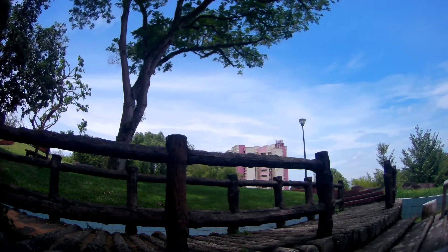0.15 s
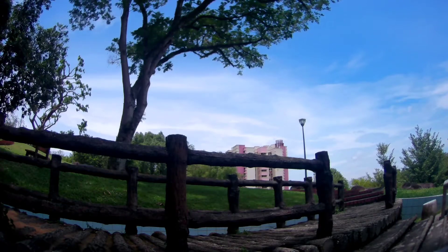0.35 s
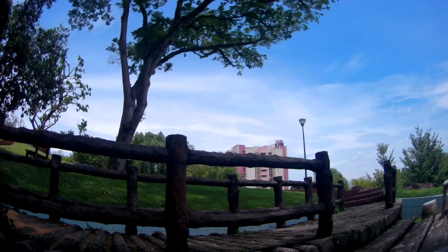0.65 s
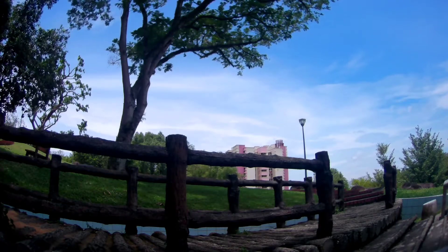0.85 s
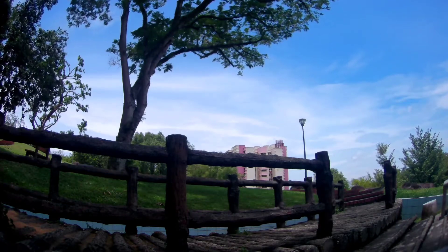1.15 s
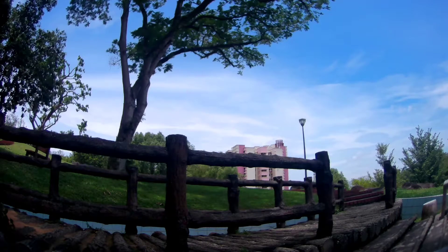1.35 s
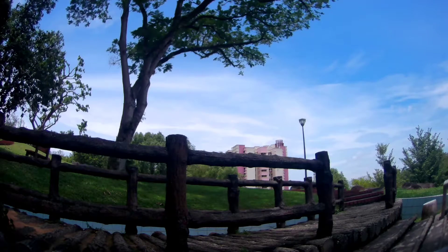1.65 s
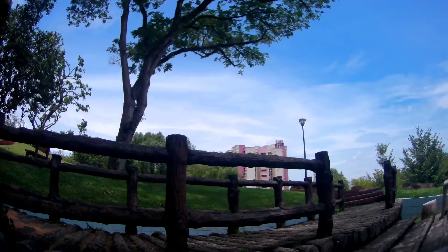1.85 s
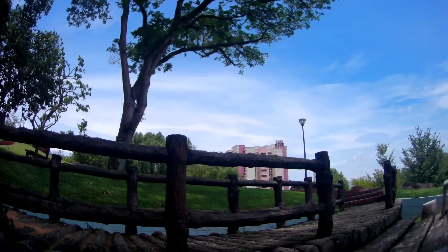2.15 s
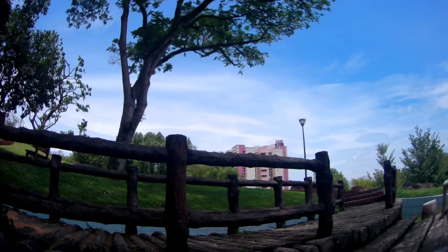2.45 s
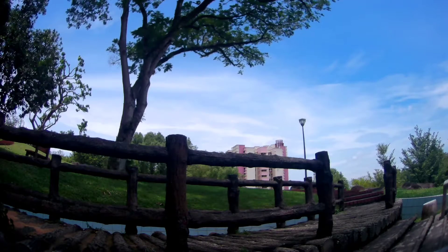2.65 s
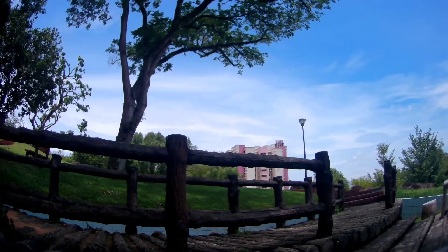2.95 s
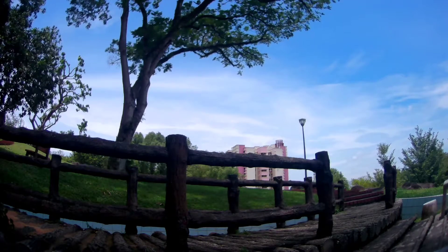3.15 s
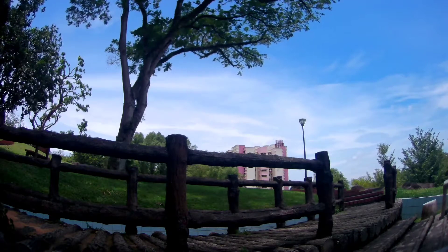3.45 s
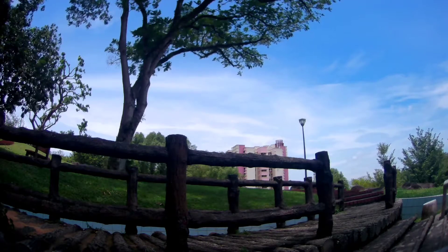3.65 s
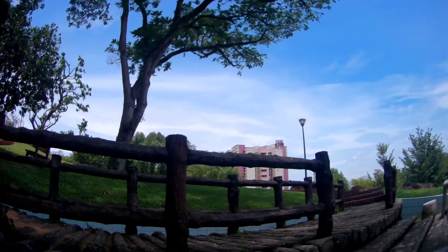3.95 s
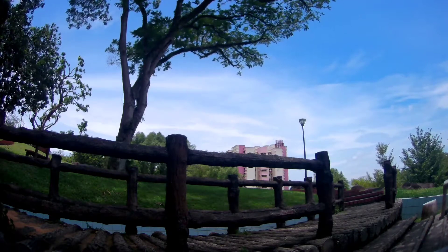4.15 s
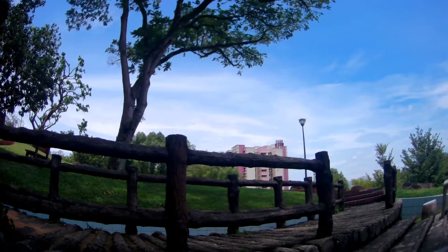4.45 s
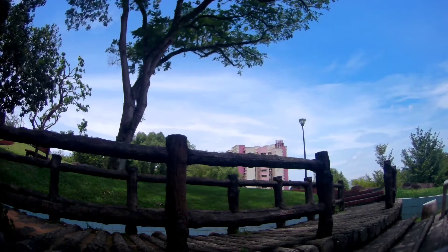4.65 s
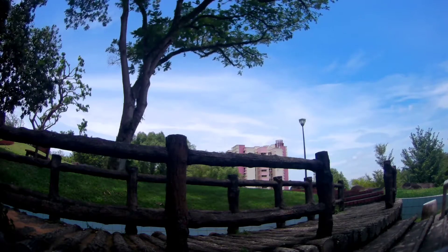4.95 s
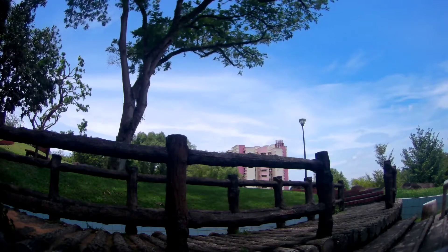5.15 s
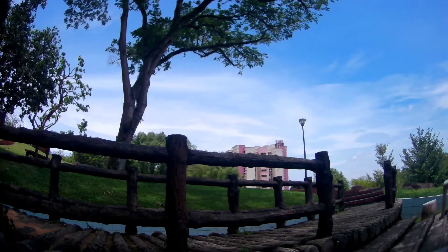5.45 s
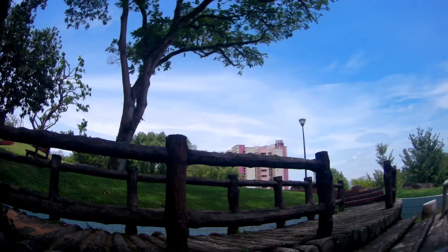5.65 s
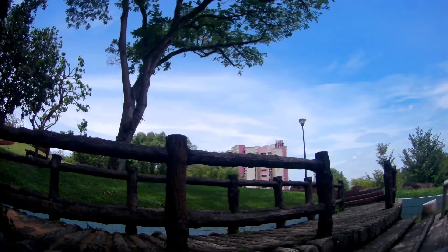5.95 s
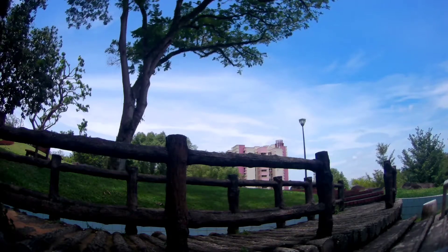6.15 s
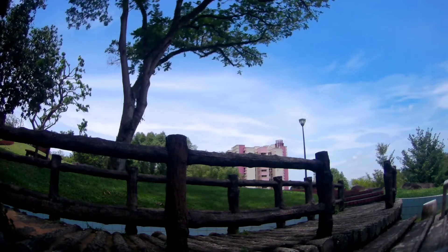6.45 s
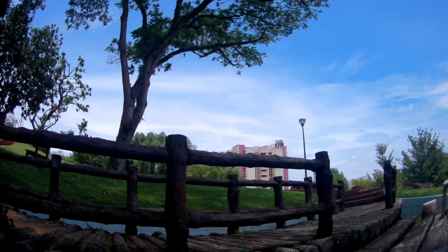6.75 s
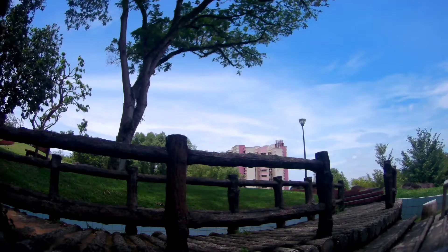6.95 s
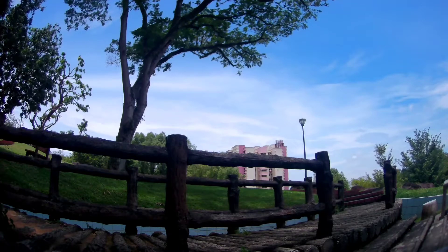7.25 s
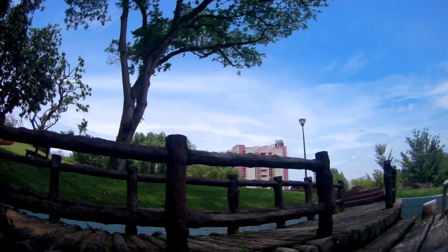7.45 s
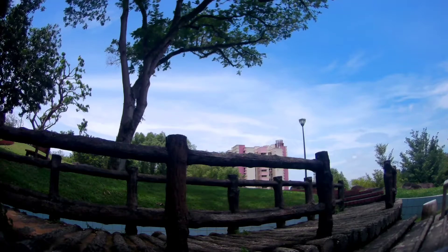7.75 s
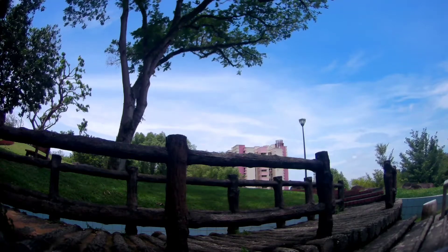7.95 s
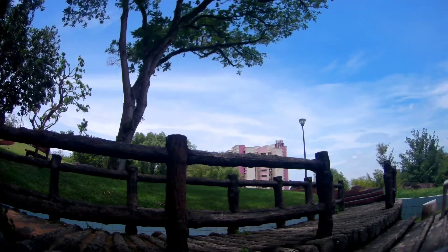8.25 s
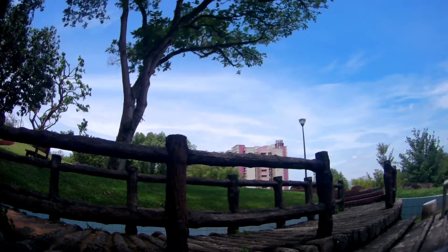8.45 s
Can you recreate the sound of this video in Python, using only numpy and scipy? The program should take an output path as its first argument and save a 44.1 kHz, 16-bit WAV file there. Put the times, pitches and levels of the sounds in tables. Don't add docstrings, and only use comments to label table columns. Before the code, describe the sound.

Light wind hisses through leaves in an open park while small birds whistle and chip, and low gusts rumble and thump the microphone.

```python
import sys
import numpy as np
from scipy import signal
from scipy.fft import rfft, irfft
from scipy.io import wavfile
from scipy.ndimage import uniform_filter1d

SR = 44100
rng = np.random.default_rng(int(sys.argv[2]) if len(sys.argv) > 2 else 0)


def attenuation_scalar(level_db):
    decades = np.asarray(level_db, float) / 20
    return 10 ** decades


def persist_wave(psi):
    counts = np.round(np.clip(psi, -1, 1) * 32767).astype(np.int16)
    wavfile.write(sys.argv[1], SR, np.atleast_2d(counts).T)


N = 379260


def unit(x):
    return x / np.sqrt(np.mean(x ** 2))


def curve(table):
    s, db = np.transpose(table)
    return np.interp(np.arange(N) / SR, s, db)


def add(track, s, sound):
    i = int(s * SR)
    track[i:i + len(sound)] += sound[:max(N - i, 0)]


def walk(rate_hz, size=N):
    hold = max(int(SR / rate_hz), 1)
    held = np.repeat(rng.standard_normal(size)[:size // hold + 1], hold)[:size]
    return 1.62 * uniform_filter1d(uniform_filter1d(held, hold), hold)


def band(x, table, lo_hz, hi_hz):
    hz = np.maximum(np.arange(len(x) // 2 + 1) * SR / len(x), 1)
    table_hz, table_db = np.transpose(table)
    colour = attenuation_scalar(np.interp(np.log(hz), np.log(table_hz), table_db))
    edges = np.sqrt(1 / (1 + (lo_hz / hz) ** 8) - 1 / (1 + (hi_hz / hz) ** 8))
    return irfft(rfft(x) * colour * edges, len(x))


def grains(per_s, spread_db):
    struck = rng.random(N) < per_s / SR
    sign = np.sign(rng.standard_normal(N))
    size = np.minimum(rng.exponential(size=N), 6)
    return unit(struck * sign * attenuation_scalar(spread_db * size))


# pitch_hz [Hz], level_db [dB per Hz]
AIR_COLOUR = [(12, -31), (20, 4.5), (59, -7.5), (126, -5), (266, -10.5), (452, -9.5), (597, -13),
              (1040, -11.5), (1870, -16), (2210, -17.5), (6540, -21.5), (8640, -16.5), (12100, -28),
              (14300, -31.5), (15500, -37.5)]
# start_s [s], level_db [dB]
CROWN_WIND = [(0.0, -46), (0.36, -46.5), (1.08, -45), (1.65, -43.5), (2.11, -44.5), (2.42, -46),
              (3.5, -46.5), (4.07, -45.5), (5.01, -46.5), (6.15, -45.5), (8.6, -45)]


def crowns():
    hiss_db = curve(CROWN_WIND)
    t = np.arange(N) / SR
    high_db = 0.98 * hiss_db + 0.37 * t
    rush_db = 0.31 * hiss_db - 0.25 * t
    stir = rng.standard_normal(N) + attenuation_scalar(-18) * grains(per_s=1500, spread_db=2.5)
    layers = [(1200, 3000, rush_db), (3000, 5500, (rush_db + hiss_db) / 2),
              (5500, 12000, hiss_db), (12000, 20000, high_db)]
    out = np.zeros(N)
    for lo_hz, hi_hz, db in layers:
        breath_db = 0.72 * walk(9)
        out += band(stir, AIR_COLOUR, lo_hz, hi_hz) * attenuation_scalar(db - db.mean() + breath_db)
    return unit(out) * attenuation_scalar(-43.0)


def town():
    wash = unit(band(rng.standard_normal(N), AIR_COLOUR, 14, 1134))
    return wash * attenuation_scalar(-44.5 + 0.63 * walk(3.19))


# pitch_hz [Hz], level_db [dB per Hz]
PORT_COLOUR = [(8.8, -31), (15, -2.5), (37, -1), (58, -4), (182, -13), (258, -22), (438, -29), (500, -22),
               (650, -70), (1100, -120)]
# start_s [s], level_db [dB]
PORT_WIND = [(0.0, -51.5), (2.27, -41), (2.51, -48.5), (3.26, -41), (3.33, -41), (4.07, -44), (4.09, -38),
             (4.48, -49), (4.93, -46.5), (5.25, -44), (6.35, -47.5), (6.44, -44.5), (6.82, -40.5),
             (7.45, -36), (7.47, -30.5), (7.88, -33.5), (8.26, -29.5), (8.6, -38)]


def port():
    roll_db = curve(PORT_WIND)
    quick_db = -0.5 * (roll_db + 49.5)
    eddies = 0.5 * grains(per_s=200, spread_db=2.5) + rng.standard_normal(N)
    rolls = unit(band(eddies, PORT_COLOUR, 25, 89)) * attenuation_scalar(0.32 * walk(8.7))
    flaps = unit(band(eddies, PORT_COLOUR, 108, 440)) * attenuation_scalar(quick_db - 3.5 + walk(10))
    return attenuation_scalar(roll_db - 3.5) * (rolls + flaps)


def note(s, length_s, bend_hz, db, edge, flutter_hz, steady):
    count = int(length_s * SR)
    hz = np.polyval(np.polyfit([0, .5, 1], bend_hz, deg=2), np.linspace(0, 1, count))
    flutter = steady + walk(flutter_hz, size=16000)[:count] + 1j * walk(flutter_hz, size=16000)[:count]
    flutter = flutter / np.sqrt(np.mean(np.abs(flutter) ** 2))
    fade = signal.windows.tukey(count, np.clip(edge, 0, 1)) * attenuation_scalar(np.linspace(1.5, -1.5, count))
    turning = np.exp(2j * np.pi * np.cumsum(hz) / SR)
    return s, attenuation_scalar(db) * np.sqrt(2) * (fade * flutter * turning).real


# start_s [s], length_s [s], start_hz [Hz], end_hz [Hz], level_db [dB]
SONG_NOTES = [(0.018, 0.28, 8510, 8140, -47), (0.065, 0.18, 8350, 8070, -41.5), (1.3, .08, 4200, 4400, -51),
              (1.533, 0.1, 3695, 3715, -55), (1.58, 0.26, 6810, 6590, -55), (1.74, .165, 4110, 4010, -49),
              (1.816, 0.11, 3680, 3580, -55), (1.913, .115, 4700, 4570, -50.5),
              (2.683, 0.075, 3620, 3150, -45), (2.73, .12, 3200, 3090, -48),
              (4.187, 0.096, 3590, 3660, -50), (4.432, .1, 3980, 4040, -58),
              (4.937, 0.089, 3420, 3180, -55), (5.372, 0.15, 4610, 4585, -46), (6.38, 0.1, 4700, 4650, -46),
              (7.28, .055, 4530, 4510, -50), (7.5, 0.14, 3500, 3210, -59), (7.5, .24, 7500, 7470, -55),
              (8.47, 0.11, 3710, 3700, -55), (8.5, .1, 3620, 3010, -52)]


def songs():
    out = np.zeros(N)
    for s, length_s, start_hz, end_hz, db in SONG_NOTES:
        done_by_middle = 0.55 + 1.8 * abs(1 - end_hz / start_hz)
        middle_hz = start_hz + done_by_middle * (end_hz - start_hz)
        bend_hz = start_hz, middle_hz, end_hz
        add(out, *note(s, length_s, bend_hz, db, edge=.5, flutter_hz=180, steady=2.6))
    return out


# start_s [s], pitch_hz [Hz], level_db [dB]
FAR_CHIPS = [(.278, 3980, -55), (.51, 2700, -52), (.795, 7480, -49), (.87, 5500, -53), (.87, 4820, -54),
             (1.03, 3450, -54), (1.08, 3270, -51), (1.16, 4130, -51), (1.199, 4700, -55),
             (1.218, 5000, -47), (1.26, 4520, -52), (2.189, 2350, -48.5), (3.96, 2260, -54),
             (4.357, 3310, -48.5), (4.535, 5015, -51), (5.31, 3605, -55), (5.37, 3840, -50),
             (5.66, 7480, -50), (5.801, 3200, -50), (5.82, 4325, -53), (5.99, 8100, -52), (6.17, 3340, -48),
             (6.732, 6235, -52), (6.74, 3400, -51), (7.18, 3510, -51), (7.21, 4550, -56),
             (7.456, 3560, -51), (7.797, 5970, -55)]


def chips():
    out = np.zeros(N)
    for s, hz, db in FAR_CHIPS:
        bend_hz = hz * np.array([1.01, 1, 0.99])
        add(out, *note(s, .045, bend_hz, db, edge=.6, flutter_hz=200, steady=1.0))
    return out


# start_s [s], level_db [dB, peak], pitch_hz [Hz]
EDDIES_IN = [(1.383, -33, 89), (1.41, -36, 45), (2.211, -30, 76), (2.248, -35, 84), (2.934, -38, 69),
             (3.278, -26.5, 71), (3.433, -27.5, 67), (3.473, -32, 103), (3.64, -35, 44.7),
             (3.803, -32, 110), (4.211, -23, 150), (4.3, -35, 90), (4.876, -28.5, 57.5), (5.87, -32, 50),
             (6.856, -28, 45), (7.305, -25, 64), (7.476, -36, 50), (7.511, -36, 71), (7.562, -22, 170),
             (7.63, -20.5, 81), (7.753, -26.5, 156), (7.82, -25, 150), (8.055, -23, 50), (8.09, -27, 55),
             (8.212, -29, 200), (8.269, -18.5, 54), (8.303, -19, 49.7)]
# start_s [s], level_db [dB, peak], pitch_hz [Hz]
EDDIES_OUT = [(.356, -35, 75), (2.084, -35, 110), (2.137, -33, 68), (3.217, -23.5, 64), (4.112, -33, 110),
              (4.21, -26, 136), (4.474, -28, 123), (4.944, -35, 74), (5.085, -27, 88), (5.506, -35, 73),
              (6.08, -41, 50), (6.332, -30, 70), (6.658, -31, 97), (6.969, -31, 58), (7.547, -25, 97),
              (7.636, -34, 120), (7.825, -22, 75), (7.991, -31, 110), (8.072, -30, 120), (8.352, -26, 170),
              (8.395, -26, 57), (8.438, -38, 150)]


def buffets():
    out = np.zeros(N)
    for table, way in ((EDDIES_IN, 1), (EDDIES_OUT, -1)):
        for s, db, hz in table:
            u = np.arange(-SR / hz, SR / hz) * hz / SR * 3.94
            swing = (1 - u ** 2) * np.exp(-u ** 2 / 2)
            add(out, s - 1 / hz, way * attenuation_scalar(db - 3.0) * swing)
    return out


# start_s [s], length_s [s], pitch_hz [Hz], spread_hz [Hz], level_db [dB]
LEAF_CHATTER = [
    (.87, .05, 5100, 900, -48),
    (1.123, .1, 3950, 900, -48),
    (1.21, .09, 4750, 800, -50),
    (1.349, 0.066, 2810, 700, -49.5),
    (1.9, .13, 4600, 960, -55),
    (2.652, 0.082, 4700, 2500, -49),
    (3.399, 0.11, 4810, 2000, -49.5),
    (4.372, 0.14, 3650, 980, -51),
    (6.19, 0.18, 4380, 2300, -48.5),
]


def chatter():
    out = np.zeros(N)
    for s, length_s, hz, spread_hz, db in LEAF_CHATTER:
        add(out, *note(s, length_s, (hz, hz, hz), db, edge=.61, flutter_hz=1.5 * spread_hz, steady=0))
    return out


# start_s [s], length_s [s], start_hz [Hz], end_hz [Hz], level_db [dB]
LONE_FLICKS = [
    (1.352, 0.019, 2880, 2670, -43),
    (2.695, 0.0059, 6300, 5900, -37.5),
    (3.424, .008, 5500, 3704, -47),
    (3.51, .014, 6000, 4600, -45),
    (6.457, .04, 4680, 4350, -49),
    (1.215, .02, 4500, 5200, -50),
    (8.438, 0.051, 3680, 3750, -47),
]


def flicks():
    out = np.zeros(N)
    for s, length_s, start_hz, end_hz, db in LONE_FLICKS:
        bend_hz = np.linspace(start_hz, end_hz, 3)
        add(out, *note(s, length_s, bend_hz, db, edge=.4, flutter_hz=300, steady=3.0))
    return out


# start_s [s], length_s [s], level_db [dB]
LEAF_SCRAPES = [
    (1.33, .027, -53),
    (1.858, .012, -43),
    (2.06, .05, -43),
    (3.96, .04, -48),
    (5.35, .04, -49),
    (5.8, .04, -52),
]


def rustles():
    strength = np.zeros(N)
    for s, length_s, db in LEAF_SCRAPES:
        add(strength, s, np.hanning(int(length_s * SR)) * attenuation_scalar(db))
    ticks = unit(band(grains(per_s=5000, spread_db=0.5), AIR_COLOUR, 4500, 16000))
    return strength * ticks


# start_s [s], level_db [dB], pitch_share [ratio]
CALL_TIMES = [
    (3.408, -47, 1.0),
    (6.235, -44.5, 0.995),
]
# delay_s [s], length_s [s], start_hz [Hz], middle_hz [Hz], end_hz [Hz]
CALL_PARTS = [
    (0, .02, 5200, 5350, 5200),
    (.014, .03, 8900, 6950, 9200),
    (.034, .032, 3950, 4750, 5150),
    (.058, .065, 5150, 5110, 5070),
]
CALL_PART_DB = [
    -1.5,
    1.5,
    -0.5,
    -5,
]


def calls():
    out = np.zeros(N)
    for s, db, share in CALL_TIMES:
        for (delay_s, length_s, *bend_hz), part_db in zip(CALL_PARTS, CALL_PART_DB):
            pitches_hz = share * np.array(bend_hz)
            add(out, *note(s + delay_s, length_s, pitches_hz, db + part_db, edge=.3, flutter_hz=300, steady=3.0))
    return out


def thud():
    rise_s, fall_s = .0012, .0034
    t = np.arange(int(.03 * SR)) / SR
    pull = np.interp(t, [0, rise_s, rise_s + fall_s], [0, 1, 0])
    back = np.sin(np.pi * np.clip((t - rise_s - 0.35 * fall_s) / 0.0126, 0, 1))
    out = np.zeros(N)
    add(out, 4.1009, attenuation_scalar(-14) * uniform_filter1d(.27 * back - pull, size=24))
    return out


def birds():
    direct = songs() + chips() + chatter() + flicks() + calls()
    t = np.arange(SR // 2) / SR
    trunks = rng.standard_normal(len(t)) * attenuation_scalar(-60 * t / 0.15) * (t > .008)
    tail = signal.fftconvolve(direct, trunks / np.linalg.norm(trunks))[:N]
    return direct + attenuation_scalar(-6.5) * tail


def scene():
    mono = crowns() + town() + port() + birds() + buffets() + rustles() + thud()
    return np.array([mono, mono])


def thin_treble(x):
    hz, _, lines = signal.stft(x, SR, nperseg=1024, noverlap=768)
    need = uniform_filter1d(rng.standard_normal(lines.shape), size=14, axis=1)
    need = uniform_filter1d(need, size=3, axis=0)
    rank = np.argsort(np.argsort(need, axis=1), axis=1) / need.shape[1]
    dropped = .22 * np.clip(hz / 10500 - 1, 0, .4) / .4
    kept = lines * (rank >= dropped[:, None])
    return signal.istft(kept, SR, nperseg=1024, noverlap=768)[1][:N]


# start_s [s], low_hz [Hz], high_hz [Hz]
CHANNEL_SPLITS = [(.85, 6290, 7500), (1.297, 4200, 5680), (1.297, 6890, 8260), (1.297, 8960, 10760),
                  (1.805, 7580, 9040), (2.317, 4170, 6970), (2.37, 4220, 5650), (3.206, 4200, 5200),
                  (3.245, 4660, 5760), (3.345, 7580, 8950), (3.807, 8270, 9640), (3.834, 6290, 7570),
                  (4.481, 6810, 8260), (5.108, 11020, 12400), (5.194, 5170, 7600), (5.711, 5170, 6370),
                  (5.711, 9560, 11020), (5.898, 5690, 7570), (6.124, 8960, 10330), (7.069, 8960, 11280),
                  (7.166, 6290, 7570), (7.706, 5170, 6880), (7.843, 4220, 6970)]


def partings(mono):
    size = 2048
    side = np.zeros(N)
    hz = np.arange(size // 2 + 1) * SR / size
    fade = np.sin(np.pi * np.arange(size) / size) ** 3
    for s, lo_hz, hi_hz in CHANNEL_SPLITS:
        inside = (hz > lo_hz) * (hz < hi_hz)
        start = int(s * SR) - size // 2
        joined = np.std(irfft(rfft(mono[start:start + size] * np.hanning(size)) * inside))
        burst = unit(irfft(rfft(rng.standard_normal(size)) * inside))
        add(side, start / SR, burst * fade * joined * attenuation_scalar(4.5))
    return side


def band_limit(x):
    return signal.sosfilt(signal.butter(12, 15660, fs=SR, output="sos"), x)


def record(dry):
    side = partings(dry[0])
    mix = thin_treble(dry[0]) + np.array([side, -side])
    return band_limit(mix)


dry = scene()
out = record(dry)
persist_wave(out)
```